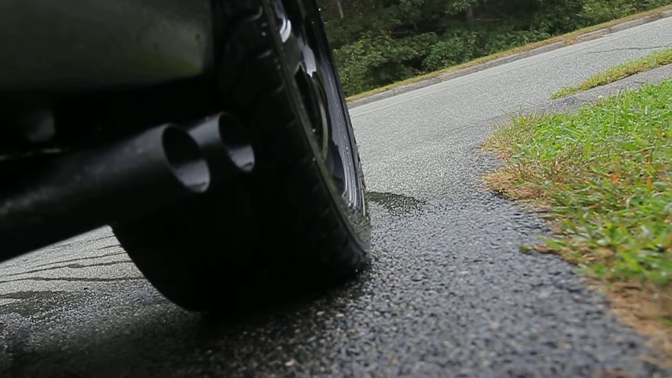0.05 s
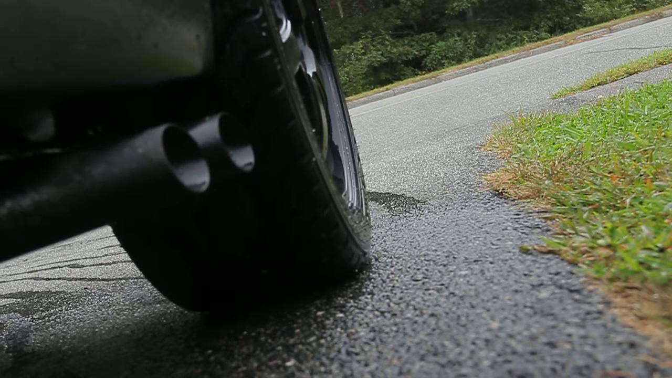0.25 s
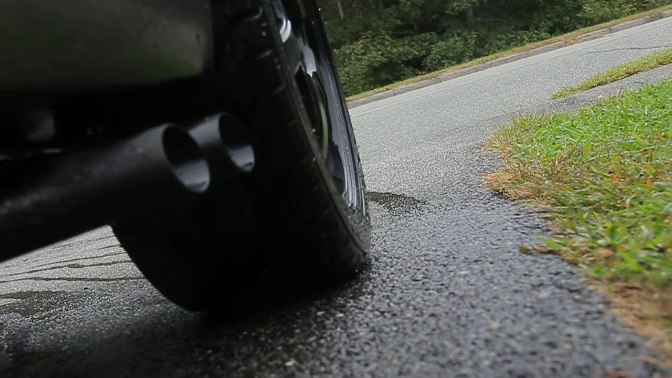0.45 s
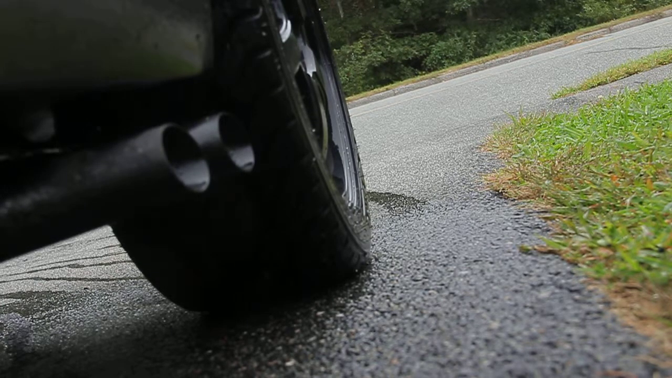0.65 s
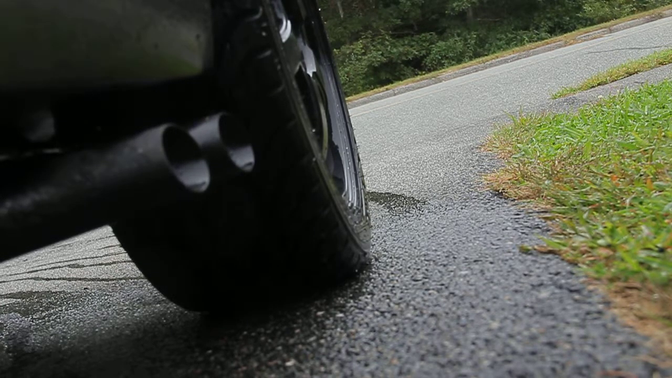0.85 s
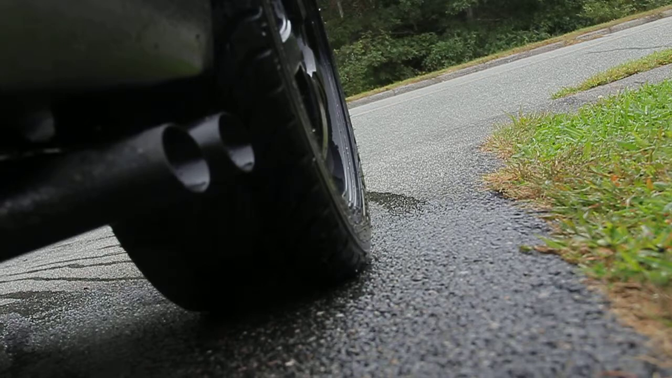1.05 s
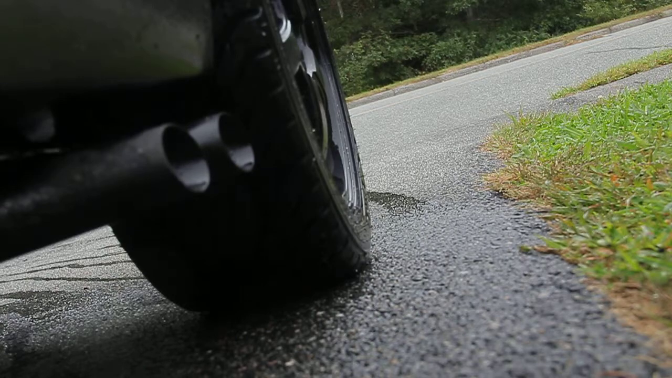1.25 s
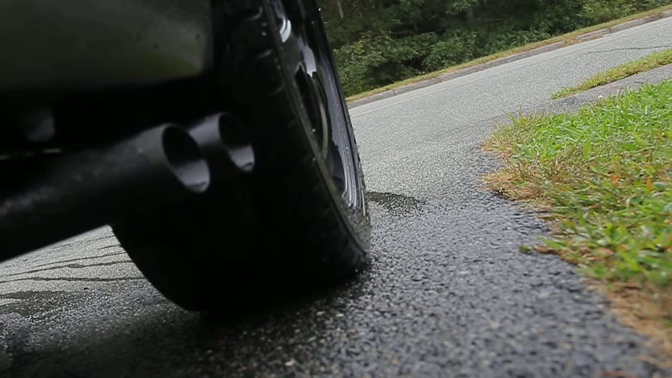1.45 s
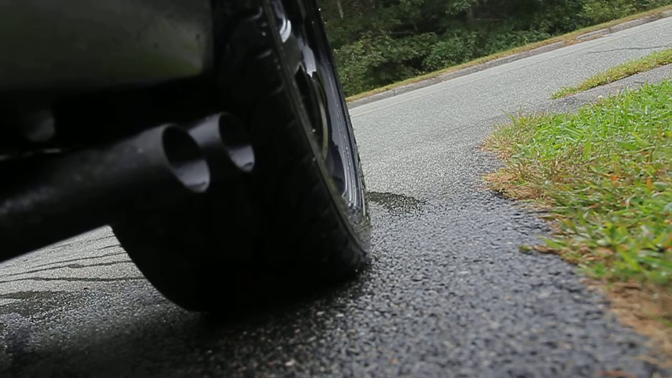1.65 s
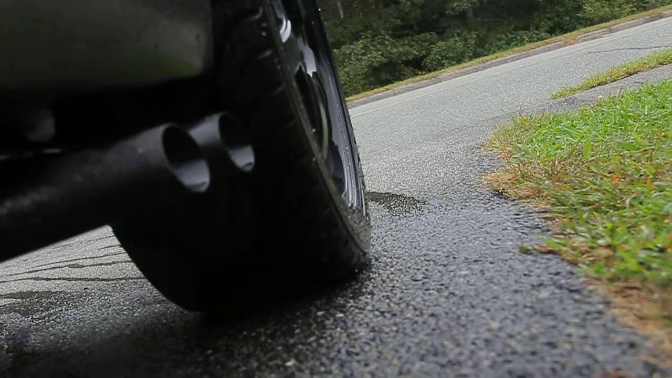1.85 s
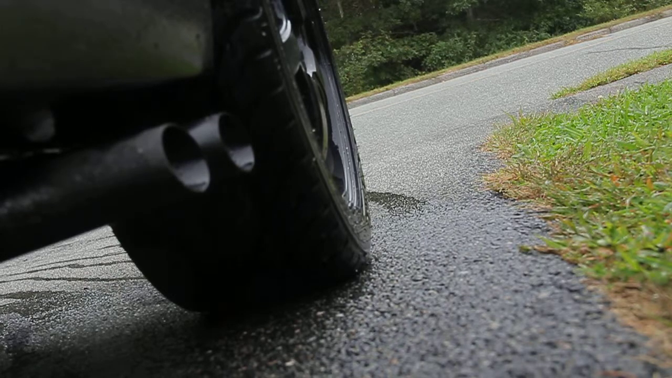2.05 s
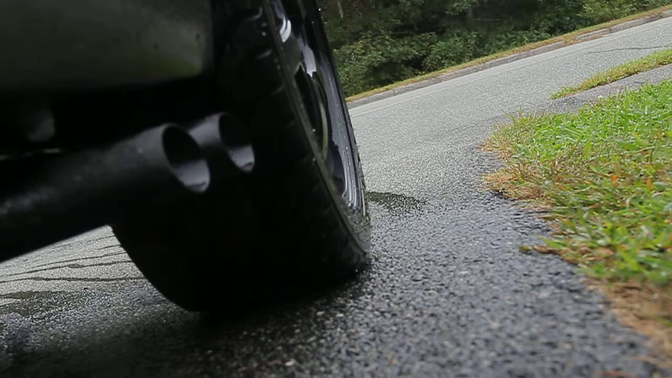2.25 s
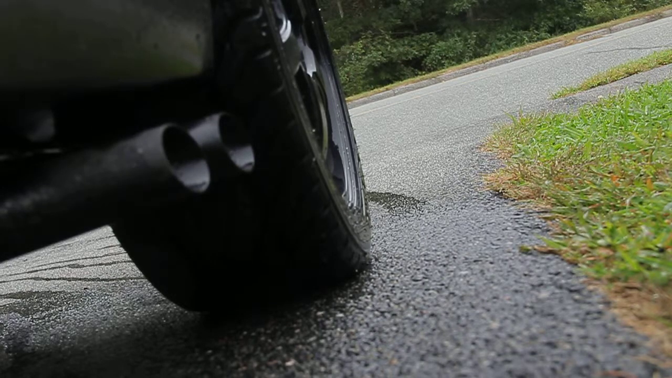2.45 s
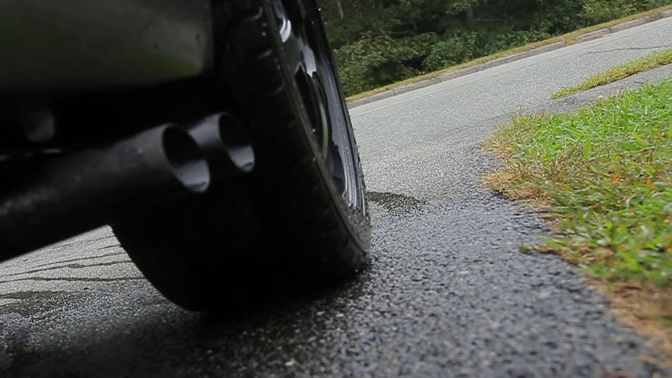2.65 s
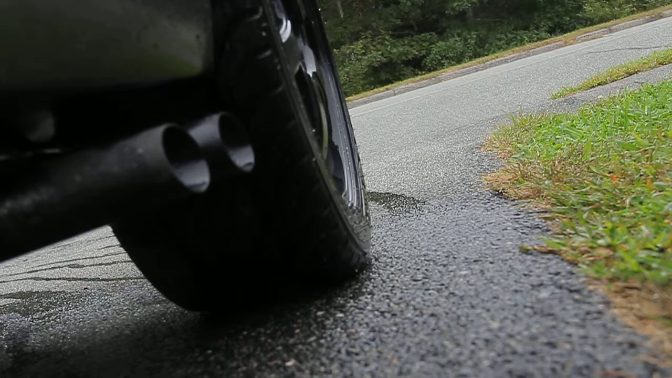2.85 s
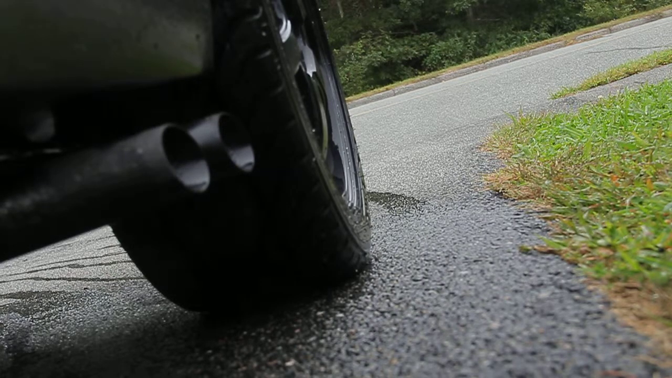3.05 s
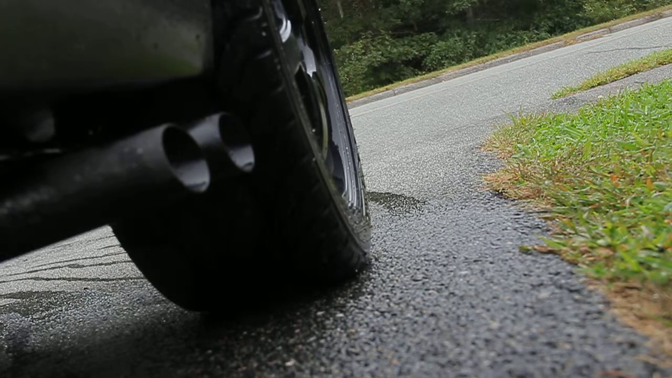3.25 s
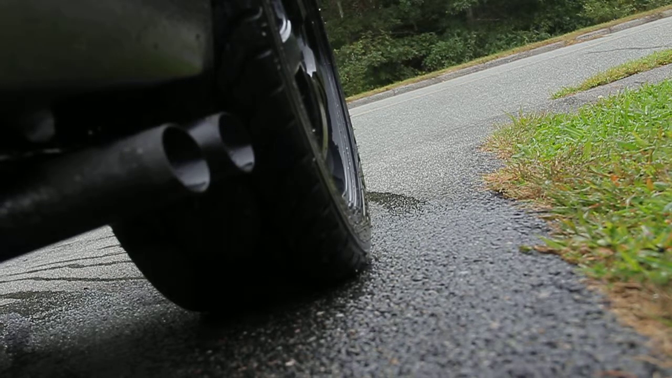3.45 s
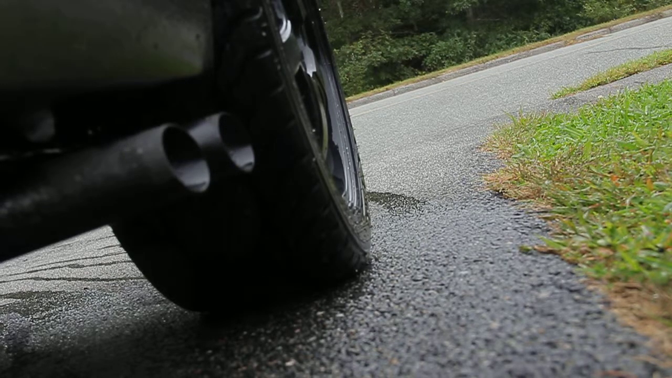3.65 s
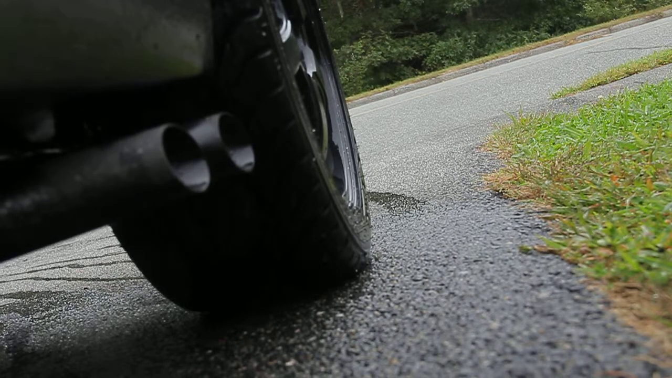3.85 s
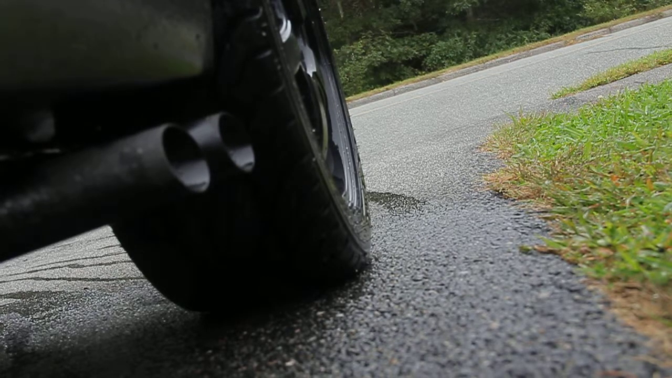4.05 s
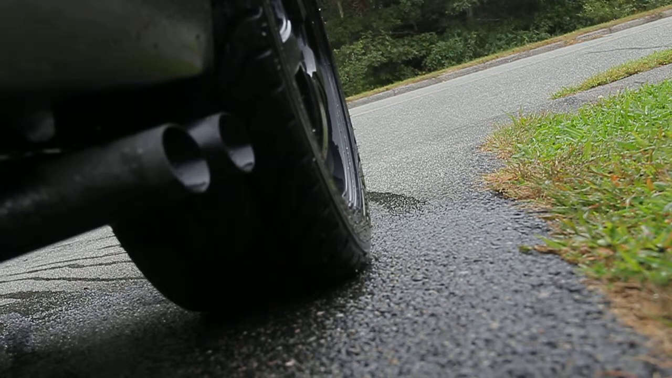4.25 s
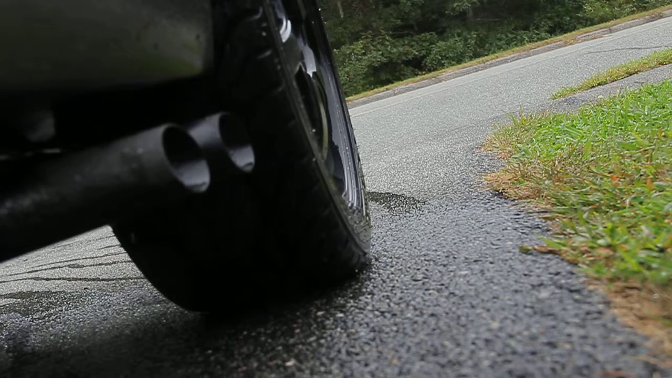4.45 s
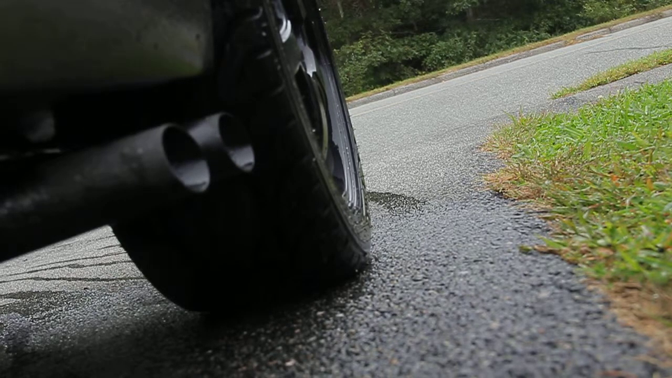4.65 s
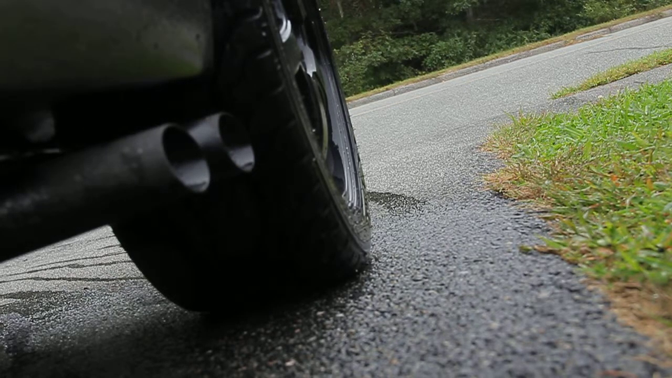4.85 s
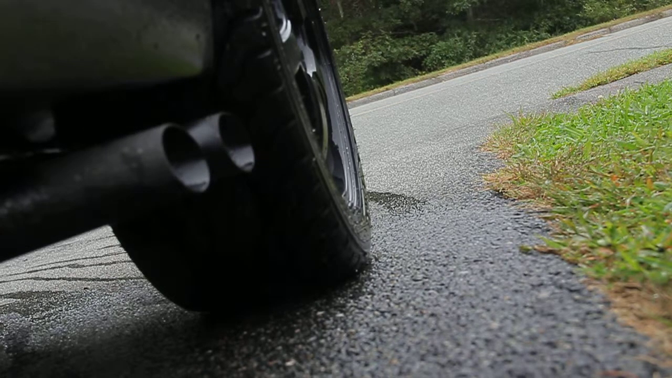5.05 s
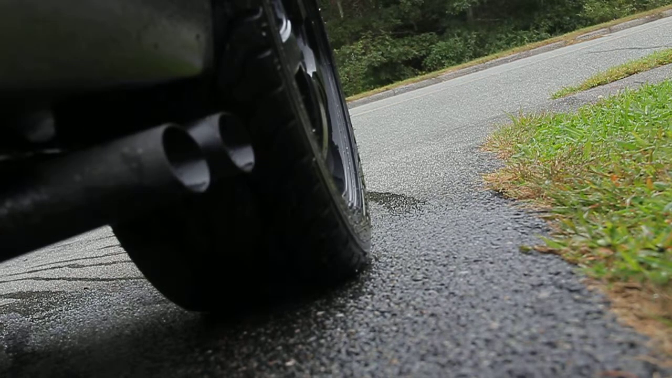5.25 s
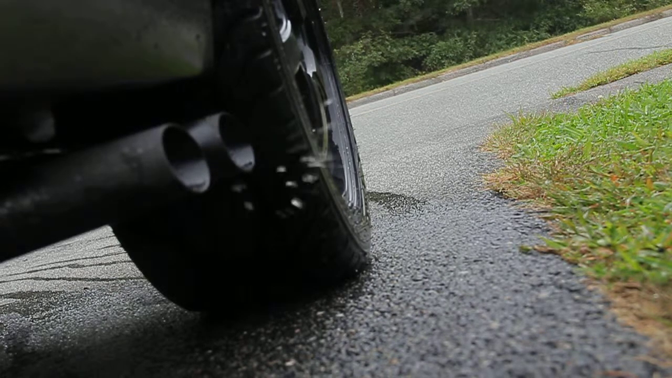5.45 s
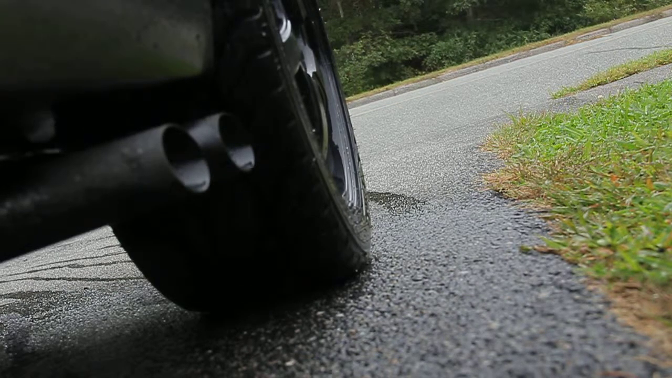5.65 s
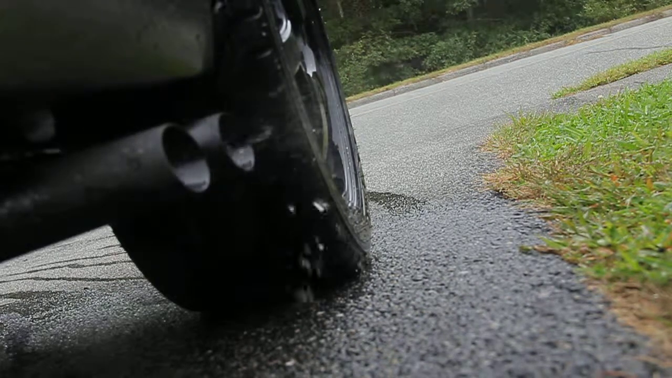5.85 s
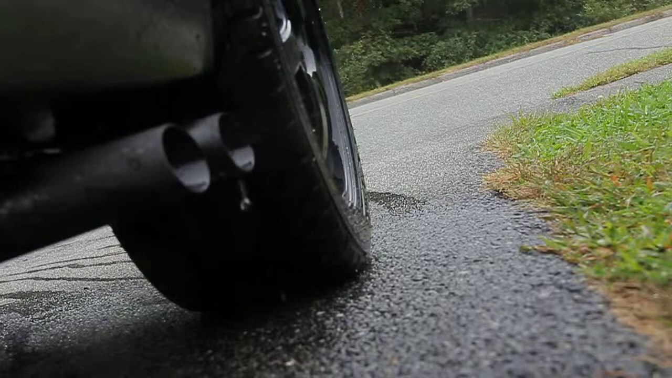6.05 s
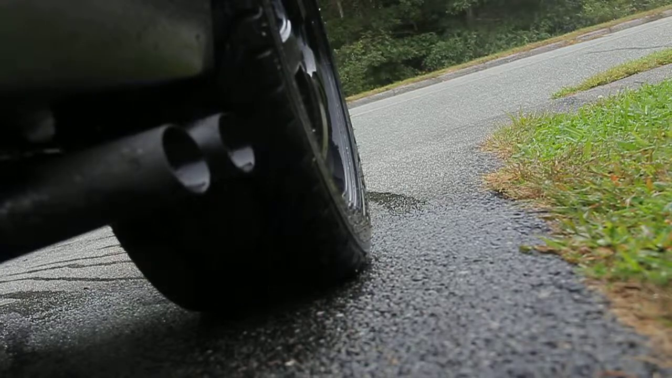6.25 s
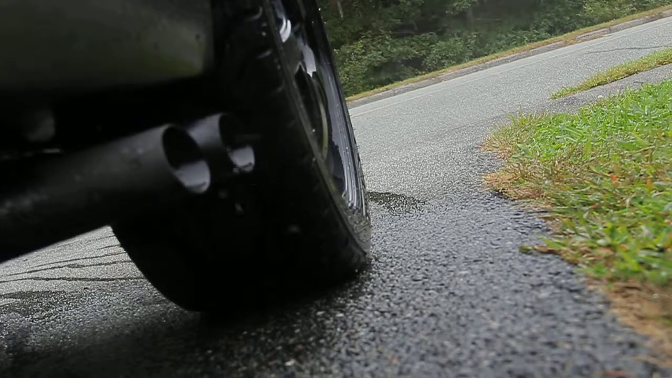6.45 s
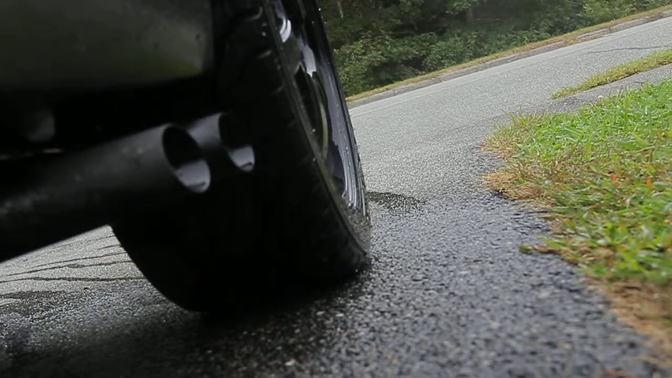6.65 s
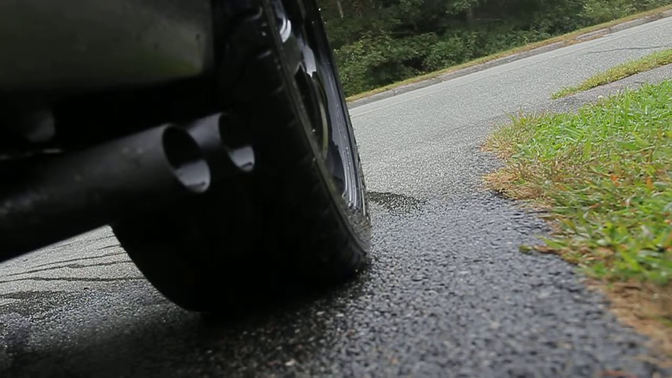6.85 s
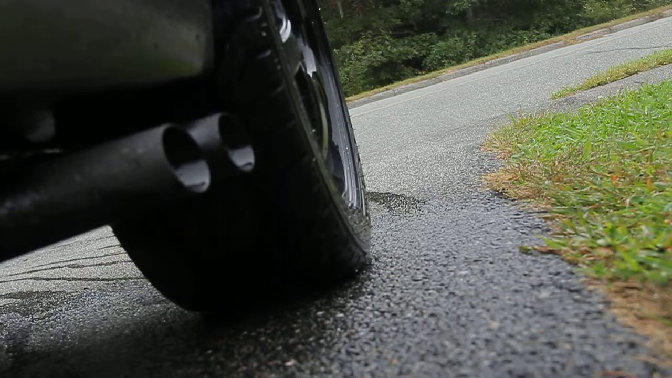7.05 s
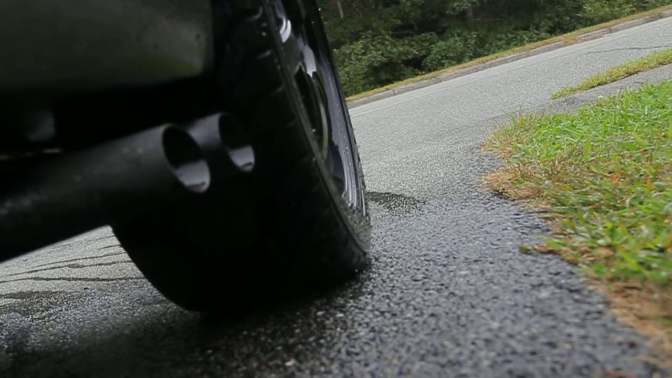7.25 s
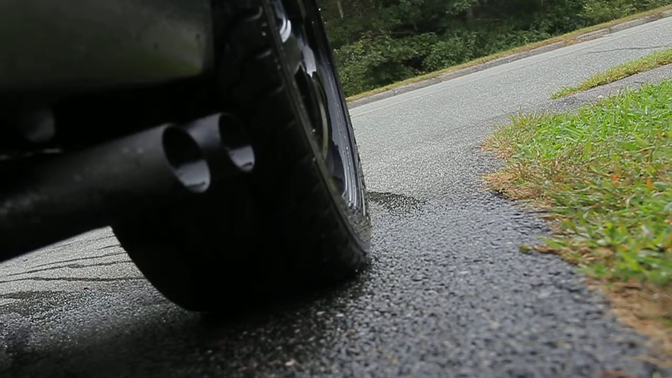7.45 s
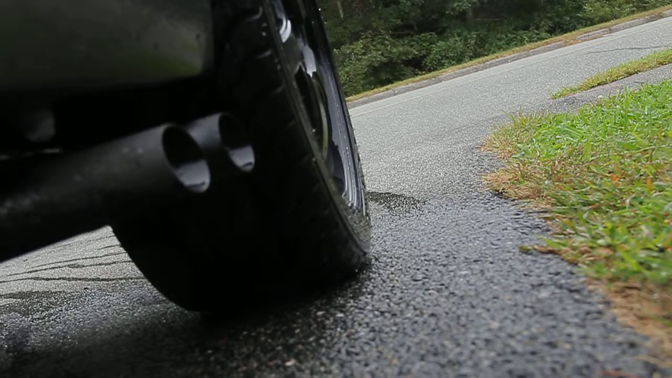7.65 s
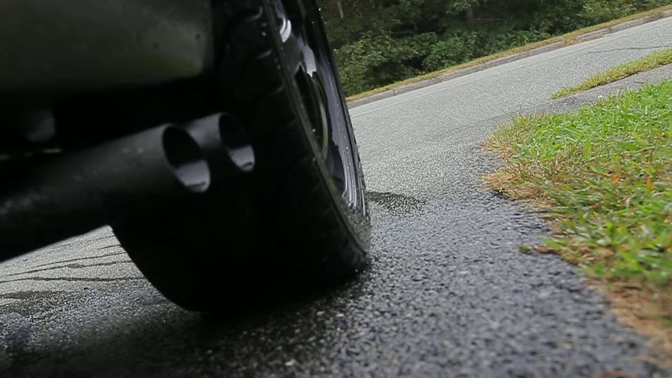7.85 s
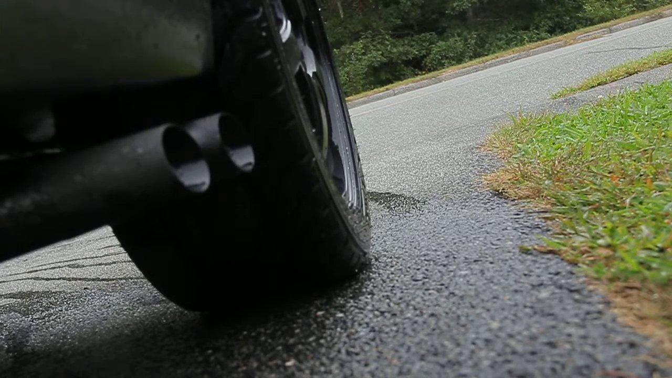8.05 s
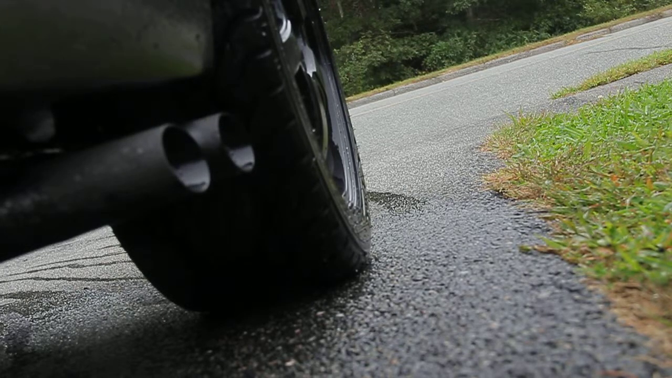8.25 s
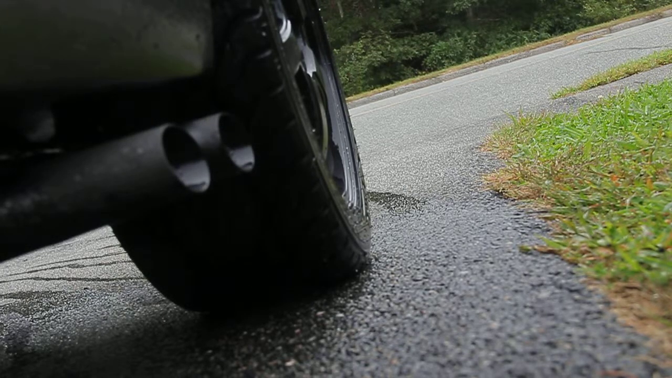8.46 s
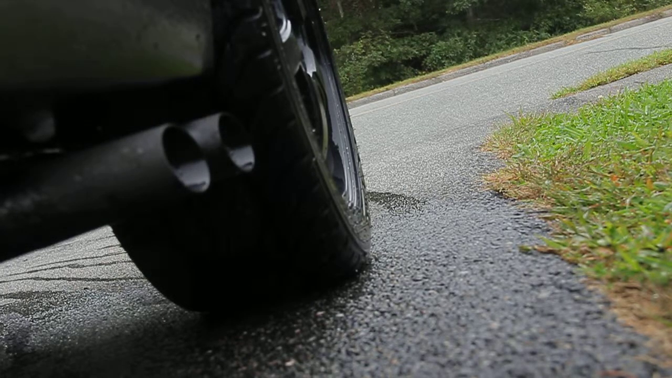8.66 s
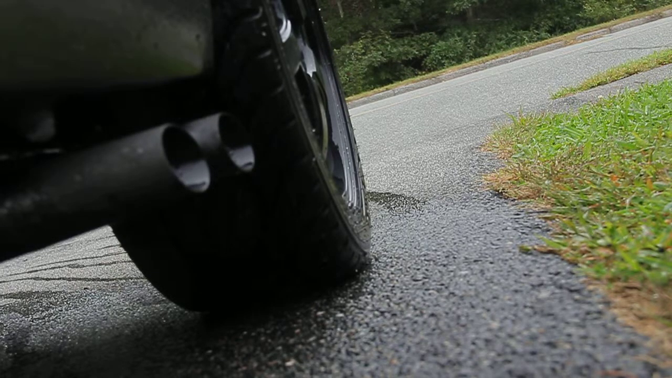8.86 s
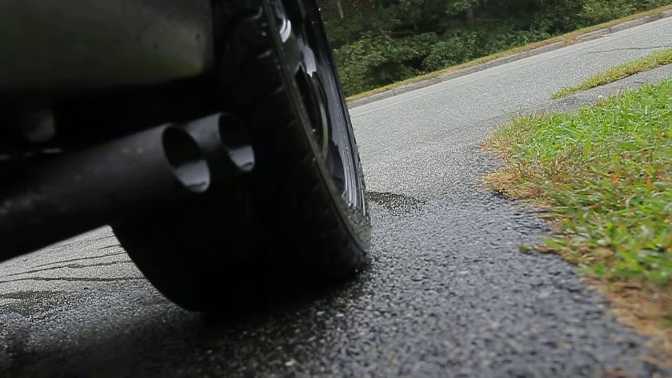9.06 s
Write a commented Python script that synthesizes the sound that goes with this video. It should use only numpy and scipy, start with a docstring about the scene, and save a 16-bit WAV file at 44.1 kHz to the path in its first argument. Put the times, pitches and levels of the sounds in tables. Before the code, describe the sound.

A microphone right beside an exhaust in open air catches a deep, throbbing car idle with soft puffing and thin engine hiss. Past the midpoint the engine suddenly revs, its note jumping into a hard, hollow, buzzing roar. Letting off brings an irregular volley of booming pops and sharp cracks while the pitch falls. The engine nearly bogs, slow and soft, then picks up to its usual burble. Mono, no echo.

```python
"""Outdoors, close to its tailpipes, a four-cylinder car idles. The throttle is blipped with a thin intake
squeak: the note climbs, unburnt fuel pops in the exhaust on the way down, the idle sags and catches itself.
Each firing sends a gas pulse into resonances of the exhaust, rings a steep front and tears a noisy rasp from
the tailpipe; hiss from the engine bay lies beneath. Pops are kicks into the pipe with bursts of noise."""
import sys
import numpy as np
from scipy import signal
from scipy.io import wavfile
from scipy.ndimage import uniform_filter1d

SR = 44100
rng = np.random.default_rng(int(sys.argv[2]) if len(sys.argv) > 2 else 0)


def materialize(psi):
    """Save the field psi as 16-bit PCM at rate SR to the path in sys.argv[1].

    A 1-D psi becomes a single channel; in a 2-D psi each row is a channel.
    """
    bounded = np.clip(np.atleast_2d(psi).T, -1, 1)
    quanta = np.round(bounded * 32767).astype(np.int16)
    wavfile.write(sys.argv[1], SR, quanta)


def boost(x):
    """Linear amplitude factor 10**(x/20) for a level x in decibels (scalar or array-like)."""
    u = np.asarray(x, float) / 20
    return 10 ** u


N = 401310
T = np.arange(N) / SR

# Resonances of the exhaust pipe. Each row: centre in Hz, width in Hz, relative level in dB.
PIPE = [(150.95, 16.5, 11), (264.06, 29.8, 7.5), (373.8, 35.6, -6.5), (542, 243, -43)]
# Gain of the exhaust between its resonances, with a cancellation near 315 Hz.
# Each row: frequency in Hz, relative level in dB.
DUCT = [(26, -33), (37, -29), (52, -24.5), (66, -13), (78, -4), (100, -2.5), (128, 0), (185, -4.5),
        (205, -1.5), (228, -4.5), (290, -18.5), (315, -63), (340, -47.5), (400, -44.5), (600, -55),
        (900, -70), (5000, -110)]
# What the steep front of a hard pulse rings. Each row: centre in Hz, width in Hz, relative level in dB.
FRONT_RING = [(300, 40, 4.5), (374, 45, 8), (503, 41, 3), (664, 29, -4), (740, 44, -12), (874, 45, -15.5),
              (1016, 55, -15.5)]
# Ring of the tailpipe tips. Each row: centre in Hz, width in Hz, relative level in dB.
TIPS = [(1000, 200, -6), (1940, 200, -1), (2900, 450, -4), (3900, 500, -9)]


def follow(points, column=1):
    """Reads one column of a table over time; its first column is in seconds."""
    columns = np.transpose(points)
    return np.interp(T, columns[0], columns[column])


def coloured(x, magnitude):
    """Causal minimum-phase filter of unit energy, its gain shaped like magnitude(hz)."""
    hz = abs(np.fft.fftfreq(16384, 1 / SR))
    log_gain = np.log(np.maximum(magnitude(hz), 1e-6))
    taps = np.fft.ifft(np.exp(np.conj(signal.hilbert(log_gain)))).real[:8192]
    return signal.oaconvolve(x, taps / np.linalg.norm(taps))[:len(x)]


def shaped(points):
    """Spectrum read from (Hz, dB) points along a logarithmic frequency axis."""
    f, db = np.transpose(points)
    return lambda hz: boost(np.interp(np.log(hz + 1), np.log(f + 1), db))


def ringing(modes, between=None):
    """Gain of a set of resonances, added in power to an optional smooth spectrum."""
    def magnitude(hz):
        power = sum((boost(db) / (1 + (2 * (hz - f) / width) ** 2)) ** 2 for f, width, db in modes)
        if between is not None:
            power = power + shaped(between)(hz) ** 2
        return np.sqrt(power)
    return magnitude


def puffs(kicks, decay_s):
    """Noise whose loudness jumps at each kick and dies away exponentially."""
    loudness = signal.lfilter([1], [1, -np.exp(-1 / (decay_s * SR))], kicks)
    return loudness * rng.standard_normal(N)


def exhaust_note(pulses, alternate, flow, note_db):
    """Gas pulses and turbulent flow ring the pipe; unequal branches colour every second firing."""
    # Level of the slow, round part of the pulse. Each row: time in seconds, relative level in dB.
    roundness = [(0, -6), (5.1, 7), (5.6, -7), (5.8, 3), (6.15, 5.5), (6.5, -8), (6.9, -9), (7.4, 7),
                 (7.9, 10), (9.1, 1.5)]
    # Ring of the unequal manifold branches. Each row: centre in Hz, width in Hz, relative level in dB.
    branch_ring = [(168, 13, -25), (215, 63, -20), (266.45, 24.4, -3), (368, 11.3, -17), (462, 33, -52)]
    # Rung only by cylinders on the long runner. Each row: centre in Hz, width in Hz, relative level in dB.
    long_ring = [(374.7, 20, 9.5), (471.5, 32.7, 3.5)]

    fade = np.exp(-2 * np.pi * 80 / SR)  # one-pole lowpass at 80 Hz
    slow = boost(follow(roundness)) * signal.lfilter([1 - fade], [1, -fade], pulses)
    note = boost(note_db) * coloured(pulses + slow + flow, ringing(PIPE, DUCT))
    note += boost(-2) * coloured(alternate, ringing(branch_ring))
    every_second = np.maximum(-alternate, 0) * boost(1.5 * rng.standard_normal(N))
    return note + boost(-16) * coloured(every_second, ringing(long_ring))


def front_roar(fronts):
    """Steep pressure fronts, each trailing a little noise, ring the exhaust's upper resonances."""
    # Plain spike of the front between its rings. Each row: frequency in Hz, relative level in dB.
    shock = [(150, -43), (300, -20), (600, -19.5), (1200, -32), (2500, -60.5), (8000, -88.5)]
    torn = boost(-32) * puffs(fronts, 0.006)
    return boost(-10) * coloured(fronts + torn, ringing(FRONT_RING, shock))


def tailpipe_rasp(clacks, throttle):
    """Each firing gives a hollow breath, a short noisy rasp and a brief ring of the tips."""
    # Colour of the rasp. Each row: frequency in Hz, relative level in dB.
    rasp_colour = [(290, -21.5), (500, -0.5), (581, -37), (684, -21), (989, -15), (1070, -21.5),
                   (1390, -24.5), (1530, -22.5), (1710, -24.5), (1880, -19), (2500, -25.5), (3150, -24.5),
                   (3970, -45.5), (4810, -41), (13000, -55)]
    breath = boost(2) * clacks + puffs(clacks, 0.0075)
    chuff = boost(2.0) * coloured(breath, ringing([(632, 91, 1.5), (788, 46, 1)]))
    rasp = boost(2.0) * coloured(puffs(clacks, 0.016), shaped(rasp_colour))
    rasp += boost(-0.5 + 3.5 * throttle) * coloured(puffs(clacks, 0.0022), ringing(TIPS))
    return chuff + rasp


def engine_bay_hiss(rate, firings):
    """Coloured noise that rises with engine speed and throbs once a crankshaft turn (two firings)."""
    # Colour of the hiss. Each row: frequency in Hz, relative level in dB.
    hiss_colour = [(290, -20), (500, -12), (553, -9.5), (737, -5), (914, -23.5), (997, -9.5), (1090, -18),
                   (1200, -10.5), (1410, -16), (2690, -18.5), (3380, -22), (8980, -31.5), (12300, -35.5),
                   (15500, -46.5)]
    # Seconds at which the extra hiss of the rev starts, is full, starts to fade, is gone.
    rev_s = (5.1, 5.22, 6.5, 6.62)
    idle_rate = 36  # firings per s from which octaves of speed are counted
    idle_db, db_per_octave, rev_db = -60.5, 7.5, 2.5
    throb_db, throb_lag = 1, 0.27  # dB either way, crankshaft turns

    hiss_db = idle_db + db_per_octave * np.log2(rate / idle_rate)
    hiss_db = hiss_db + rev_db * np.interp(T, rev_s, [0, 1, 1, 0])
    hiss_db = hiss_db + throb_db * np.cos(2 * np.pi * (firings / 2 - throb_lag))
    return coloured(boost(hiss_db) * rng.standard_normal(N), shaped(hiss_colour))


def engine():
    """Counts firings from engine speed; each cylinder drives the note, roar and rasp after its own delays."""
    # Engine speed. Each row: time in seconds, firings per second.
    speed = [(0, 38.26), (0.6, 37.46), (2.2, 37.75), (2.4, 36.45), (2.8, 36.34), (3.0, 35.63), (3.8, 34.42),
             (4.4, 34.78), (4.65, 33.45), (5.07, 33.7), (5.18, 38.63), (5.26, 49.11), (5.36, 68.9),
             (5.5, 87.62), (5.64, 85.63), (5.77, 77.01), (6.265, 63.56), (6.42, 53.22), (6.8, 45.11),
             (6.93, 38.88), (7.2, 32.14), (7.645, 26.0), (8.8, 34.58), (9.1, 33.83)]
    # Load on the engine. Each row: time in seconds, gas pulse level in dB, tailpipe rasp level in dB.
    load = [(0, -32, -57.5), (2.5, -34.5, -60), (5.07, -36.5, -63.5), (5.17, -33, -53), (5.3, -23.5, -41),
            (5.375, -24, -35.5), (5.45, -23.5, -40.5), (5.62, -22, -51.5), (5.8, -32.5, -55),
            (6.05, -28, -52.5), (6.3, -31.5, -59.5), (6.5, -28, -63), (6.7, -35, -67), (6.95, -38.5, -81),
            (7.35, -44, -70), (7.8, -44.5, -69.5), (8.15, -40, -59.5), (8.6, -36, -65), (9.1, -36, -60.5)]
    # How unevenly the cylinders burn. Each row: time in seconds, scatter of pulse size in dB.
    uneven = [(0, .5), (5.1, .5), (5.3, .8), (5.7, .8), (5.85, 2), (6.25, 3), (6.6, 2.5), (7, .6),
              (9.1, .5)]
    # Level dips and swells of the note on the way down, many just after a pop chokes the pipe; a drop
    # below 0 is a swell. Each row: middle in seconds, half length in seconds, drop of the low note in dB,
    # drop of the branch ring and steep front in dB.
    level_dips = [(5.699, 0.061, 10.5, -6), (5.767, 0.031, -2, 5), (5.989, 0.02, 29, -8.5),
                  (6.207, 0.0059, 9, 4), (6.22, 0.035, 2, 8.5), (6.327, 0.014, 2.5, 24),
                  (6.443, 0.0088, 7.5, 2), (6.552, .02, 11, 5.5), (6.655, 0.029, 15, -3.5),
                  (6.731, 0.017, 11, 40), (6.804, 0.004, 14, 15)]
    # Seconds at which the throttle starts to open, is open, starts to shut, is shut.
    throttle_s = (5.15, 5.3, 5.6, 5.9)
    # Trims of the gas pulse, the steep front and the rasp: one value in dB for each cylinder.
    pulse_trim = [1, 0, -1, 0]
    front_trim = [4.5, 1.3, 4.5, -0.5]
    rasp_trim = [5.5, -1., 1.5, -2.]
    first_s = 0.0245  # first firing of the loud cylinder
    # delays behind the pulse in s, the last for every second cylinder
    rasp_lag_s, branch_lag_s, long_runner_s = 0.0015, 0.0026, 0.0019
    front_shut_db, front_open_db = -4.5, 3  # against the gas pulse, throttle shut and open

    rate, scatter_db = follow(speed), follow(uneven)
    pulse_db, rasp_db = follow(load, 1), follow(load, 2)
    throttle = np.interp(T, throttle_s, [0, 1, 1, 0])
    branch_db, note_db = pulse_db, np.zeros(N)
    for middle_s, half_s, drop_db, ring_drop_db in level_dips:
        dip = np.exp(-((T - middle_s) / half_s) ** 4)
        note_db = note_db - drop_db * dip
        branch_db = branch_db - ring_drop_db * dip
    front_db = branch_db + front_shut_db + (front_open_db - front_shut_db) * throttle
    front_db = front_db - np.clip(3 * (45 - rate), 0, 20)  # fronts hardly steepen at idle speed

    firings = np.cumsum(rate) / SR
    count = np.floor(firings - firings[round(first_s * SR)])
    at = np.flatnonzero(np.diff(count[:-200]))  # leaves room for the delays at the end
    cylinder = (count[at].astype(int) + 1) % 4
    chance = rng.standard_normal((len(at), 3))
    interval = np.sqrt(SR / rate[at])  # keeps the mean power on the curve at any speed

    pulses, alternate, fronts, clacks = np.zeros((4, N))
    size_db = pulse_db[at] + np.take(pulse_trim, cylinder) + scatter_db[at] * chance[:, 0]
    pulses[at] = interval * boost(size_db)
    # the branch ring flips sign from one firing to the next
    ring = pulses[at] * boost(branch_db[at] - pulse_db[at]) * (-1.) ** cylinder
    alternate[at + round(branch_lag_s * SR)] = ring
    steep_db = front_db[at] + np.take(front_trim, cylinder) + scatter_db[at] * chance[:, 1]
    fronts[at + round(long_runner_s * SR) * (cylinder % 2)] = interval * boost(steep_db)
    clack_db = rasp_db[at] + np.take(rasp_trim, cylinder) + (0.5 + scatter_db[at]) * chance[:, 2]
    clacks[at + round(rasp_lag_s * SR)] = boost(clack_db)
    # turbulent gas, worse when burning is uneven
    flow = boost(pulse_db - 15.0 + 1.7 * scatter_db - 3.9 * throttle) * rng.standard_normal(N)

    note = exhaust_note(pulses, alternate, flow, note_db)
    return note + front_roar(fronts) + tailpipe_rasp(clacks, throttle) + engine_bay_hiss(rate, firings)


def intake_squeak():
    """As the throttle opens, a thin sine whistle wavers at random and sinks a little."""
    # The row: start in seconds, end in seconds, first pitch in Hz, last pitch in Hz, peak level in dB.
    whistle = (5.185, 5.235, 11300, 11100, -64)
    start, end, high_hz, low_hz, db = whistle
    waver = 900 * uniform_filter1d(rng.standard_normal(N), 60)
    hz = np.interp(T, [start, end], [high_hz, low_hz]) + waver
    swell = np.sin(np.pi * np.clip((T - start) / (end - start), 0, 1)) ** 2
    return boost(db) * swell * np.sin(2 * np.pi * np.cumsum(hz) / SR)


def afterfire():
    """Each pop of unburnt fuel kicks the pipe, echoes once and throws a bright burst of noise."""
    # Pops in the exhaust. Each row: time in seconds, kick level in dB, crack against the kick in dB.
    pops = [(5.697, -9.5, -37), (5.721, -5.5, -43), (5.776, -2, -41), (5.784, -13, -19.5),
            (5.978, -12, -28), (6.011, -32, -38), (6.155, -5, -24), (6.203, -3, -27.5), (6.249, -13, -23),
            (6.405, -11.5, -29.5), (6.46, -11.5, -28), (6.497, -8, -43), (6.596, -27, -39),
            (6.659, -21, -34), (6.749, -26.5, -45), (6.817, -44, -35)]
    # Colour of a pop. Each row: frequency in Hz, relative level in dB.
    pop_colour = [(41, -27.5), (70, 14), (210, 13.5), (568, 11), (870, 2), (1200, -16.5), (1420, -14.5),
                  (1920, -19), (3190, -37.5), (3760, -31), (5100, -52), (9000, -55.5), (11700, -66),
                  (19800, -120)]

    kicks, bright = np.zeros((2, N))
    for s, kick_db, crack_db in pops:
        kicks[round(s * SR)] = boost(kick_db)
        bright[round(s * SR)] = boost(kick_db + crack_db)
    echoes = kicks + boost(0.5) * np.roll(kicks, round(0.00762 * SR))
    thud = coloured(boost(2.5) * echoes + boost(-12.5) * puffs(kicks, 0.016), shaped(pop_colour))
    boom = boost(7.5) * coloured(-kicks, ringing(PIPE, DUCT))
    boom += boost(1.5) * coloured(kicks, ringing(FRONT_RING))

    def without_bass(hz):
        """The pop's colour, falling away steeply below 1300 Hz."""
        return shaped(pop_colour)(hz) / (1 + (1300 / (hz + 1)) ** 4)

    snap = boost(2.5) * coloured(puffs(bright, 0.00046), ringing(TIPS))
    crack = boost(4.0) * coloured(puffs(bright, 0.0092), without_bass)
    return thud + boom + snap + crack


def scene():
    """All sources close to one microphone in the open air, as one channel."""
    return (engine() + intake_squeak() + afterfire())[None]


def band_limit(x):
    """A steep low-pass at the top of the band."""
    return signal.sosfilt(signal.butter(12, 15660, fs=SR, output="sos"), x)


def record(dry):
    """A small microphone loses the deepest bass, below 24 Hz."""
    thinned = signal.sosfilt(signal.butter(2, 24, "high", fs=SR, output="sos"), dry)
    return band_limit(thinned)


dry = scene()
out = record(dry)
materialize(out)
```